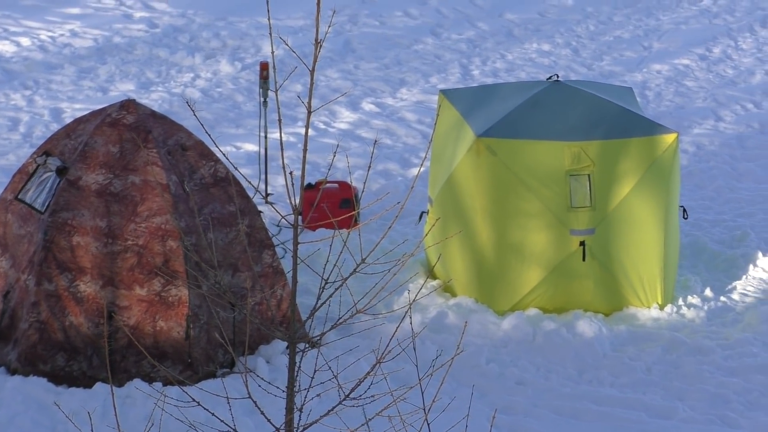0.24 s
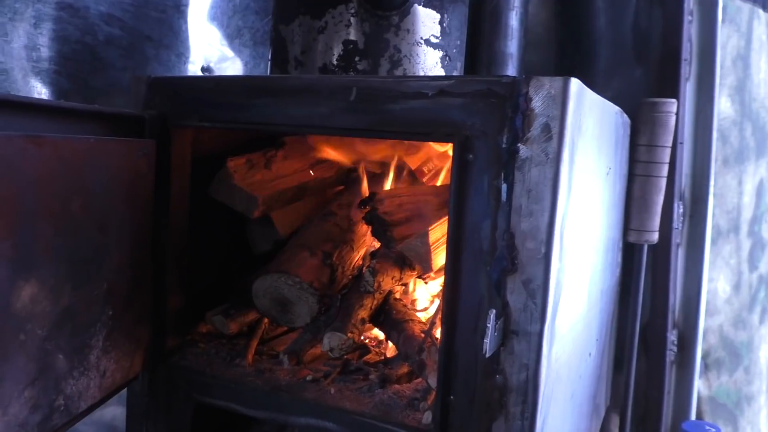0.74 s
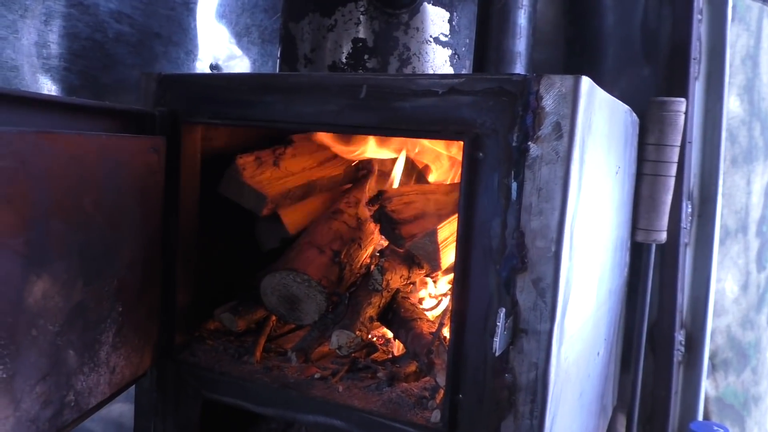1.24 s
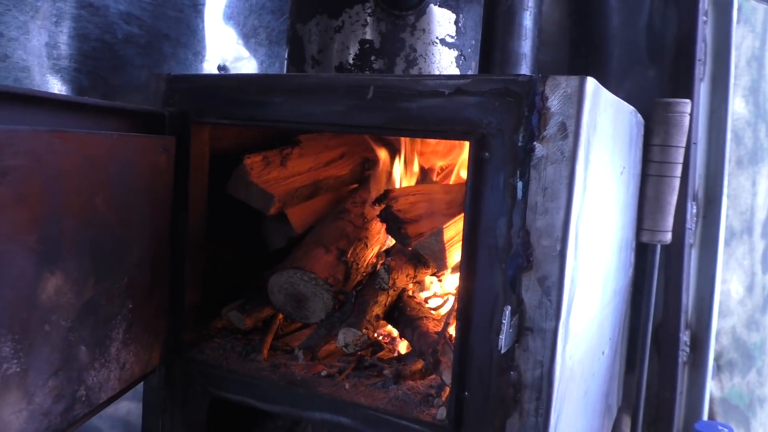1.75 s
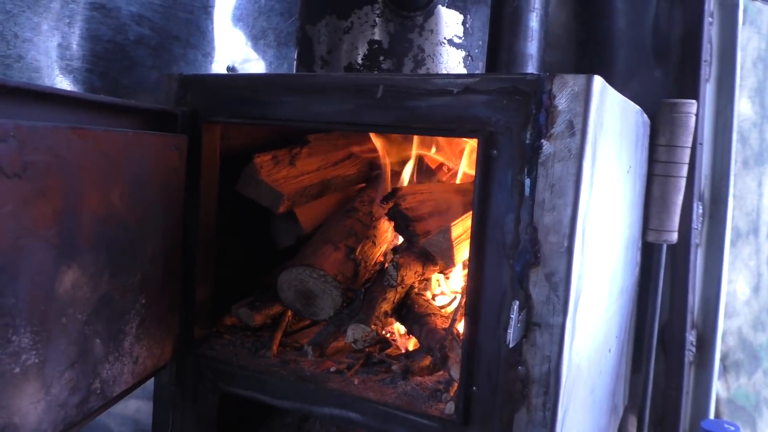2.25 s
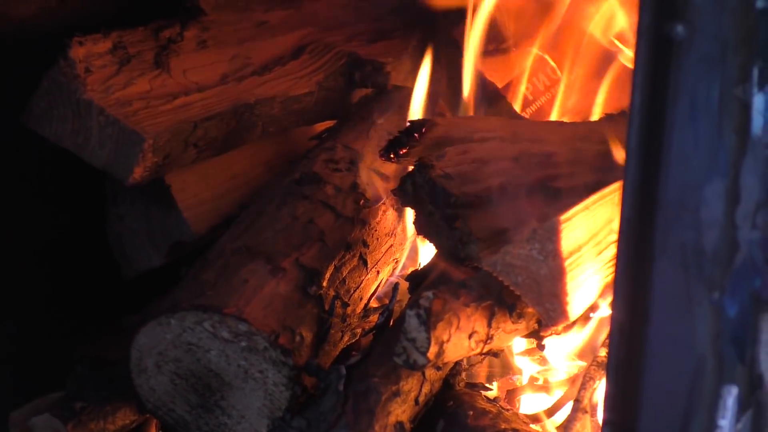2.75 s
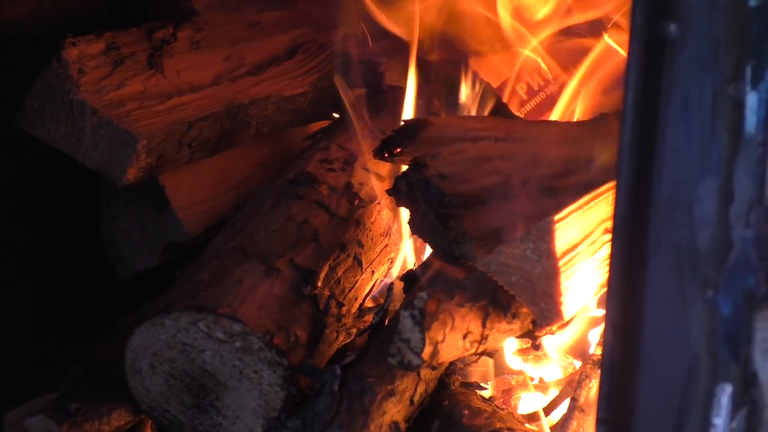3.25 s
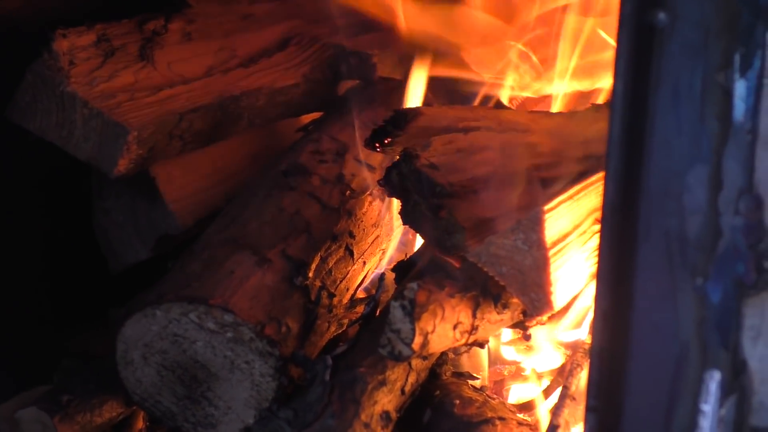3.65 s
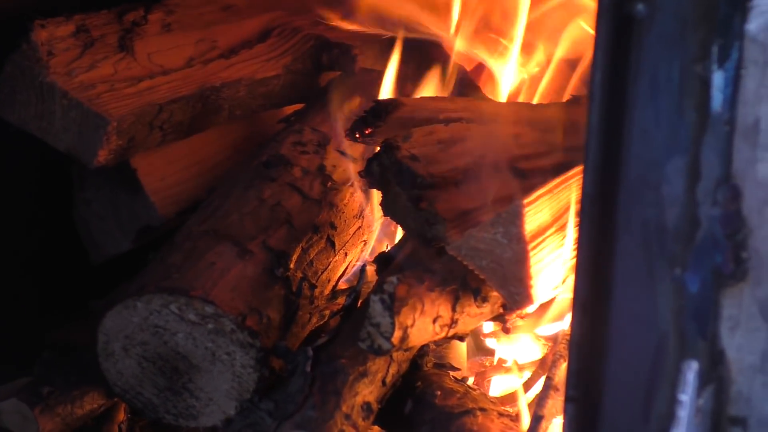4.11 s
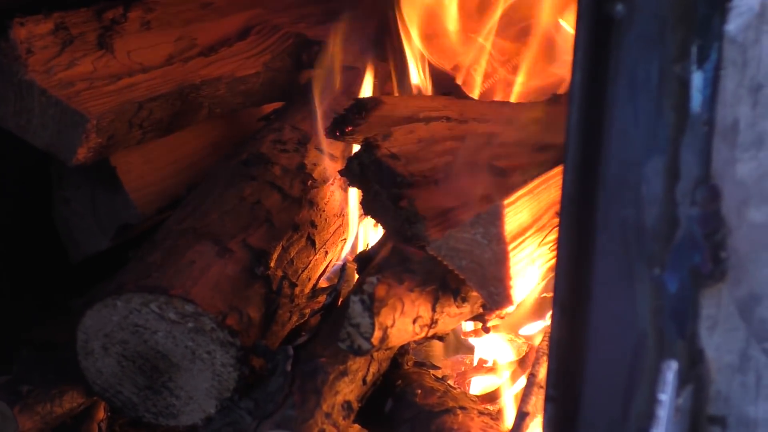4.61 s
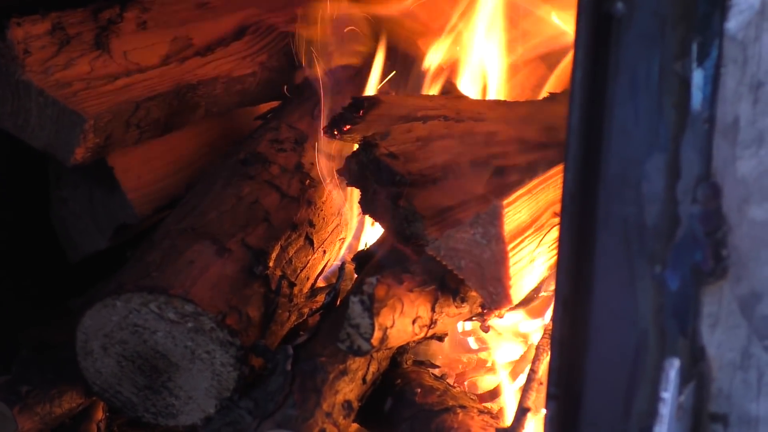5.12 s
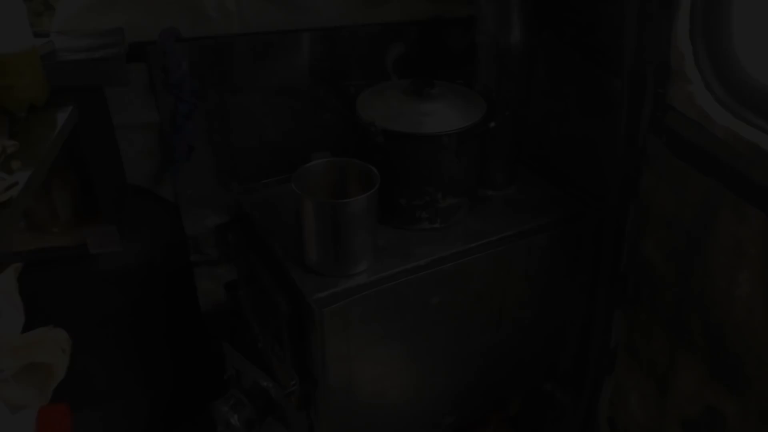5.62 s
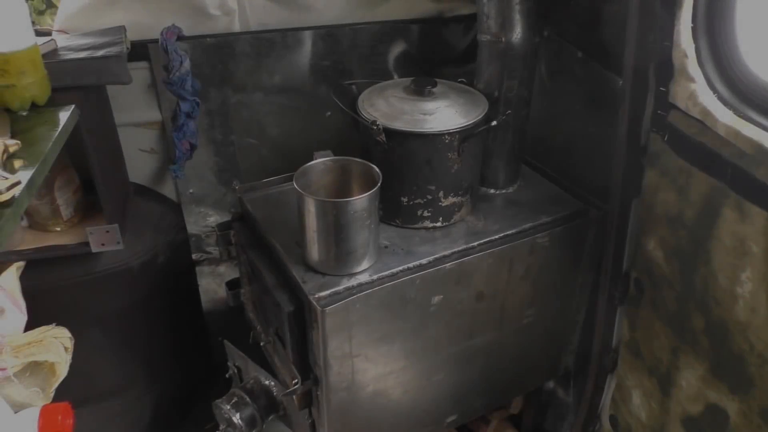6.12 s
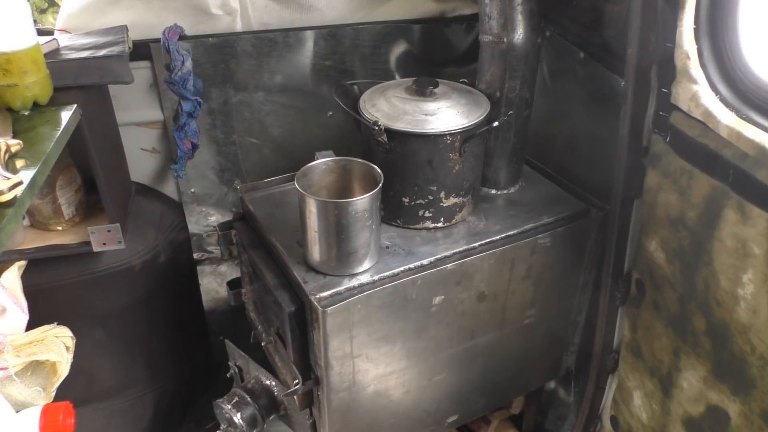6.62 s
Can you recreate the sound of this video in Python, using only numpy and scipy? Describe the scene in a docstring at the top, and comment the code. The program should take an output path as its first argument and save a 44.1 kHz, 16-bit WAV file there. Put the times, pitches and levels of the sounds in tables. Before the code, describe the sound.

From 0 to 0.66 s, quiet wind buffets the microphone over open snow: low, flickering rumble, small dull thuds near 0.13, 0.43, 0.53 and 0.6 s, and very faint airy hush. At 0.67 s it cuts to a close, wide stereo wood fire in a sheet-iron stove. Dense fine ticks and irregular sharp pops ride over a lumpy low roar and bright hiss, swelling around 2.2 s. Especially hard cracks land near 1.77 and 2.78 s; a millisecond splice interrupts at 2.33 s. Soft low puffs boom near 2.14 and 4.72 s, with brief metallic wall rings under some pops, thin steam whistles near 2.8 and 4.8 s, and a small gas rasp at 4.25 s. Crackling stays busy until an abrupt stop at 5.57 s. A pot's steady, fizzing simmer with a hollow metallic hum then fades in smoothly, reaching its quiet full level around 6.7 s.

```python
"""Wind buffeting a microphone over open snow opens the piece: flickering noise, struck resonances, faint air.
It cuts to logs burning in a sheet-iron stove with its door open: roar and hiss are shaped noise, pops and
crackle are filtered noise bursts, puffs and wall rings are struck resonances, with steam whistles and one rasp.
Last, a pot simmers on the stove, faded in: fizzing noise ringing the pot's walls.
"""
import sys
import numpy as np
from scipy import signal
from scipy.io import wavfile
from scipy.ndimage import uniform_filter1d, map_coordinates

SR = 44100
rng = np.random.default_rng(int(sys.argv[2]) if len(sys.argv) > 2 else 0)


def waveform_to_disk(signal):
    """Save audio, clipped to [-1, 1], as 16-bit WAV at the path in sys.argv[1]."""
    frames = np.transpose(np.atleast_2d(signal))
    scaled = np.clip(frames, -1, 1) * 32767
    samples = np.round(scaled).astype(np.int16)
    wavfile.write(sys.argv[1], SR, samples)


def attenuation_scalar(level_db):
    """Turn a level in dB into a linear amplitude multiplier (20 dB per decade)."""
    decades = np.asarray(level_db, float) / 20
    return 10 ** decades


N = 302694   # samples


def curve(points):
    """A table of (start_s, value) drawn as straight lines, sample by sample."""
    s, value = np.transpose(points)
    return np.interp(np.arange(N) / SR, s, value)


def at_hz(points, hz):
    """Value of a table on a log-frequency axis."""
    table_hz, value = np.transpose(points)
    return np.interp(np.log(hz), np.log(table_hz), value)


def rms_one(x):
    """Scaled to unit rms."""
    return x / np.sqrt(np.mean(x ** 2) + 1e-20)


def lean_left(db):
    """Left and right gains that set the left side db over the right."""
    return attenuation_scalar(np.array([[db / 2], [-db / 2]]))


def drift(rate):
    """Smooth random wander of spread about 1, with new values rate times a second."""
    knots = rng.standard_normal(400)
    return map_coordinates(knots, [np.arange(N) / SR * np.clip(rate, 0, 55)], order=3)


def band_pass(x, order, edges_hz):
    """Butterworth band-pass."""
    return signal.sosfilt(signal.butter(order, edges_hz, "band", fs=SR, output="sos"), x)


def top_cut(x):
    """Ends the sound steeply just under 16 kHz."""
    return signal.sosfilt(signal.ellip(10, .5, 50, 15750, fs=SR, output="sos"), x)


def resonate(x, modes):
    """Each mode lifts a narrow peak out of the sound; a negative lift carves a notch."""
    for hz, width_hz, lift_db in modes:
        b, a = signal.iirpeak(hz, hz / width_hz, fs=SR)
        x = x + (attenuation_scalar(lift_db) - 1) * signal.lfilter(b, a, x)
    return x


def boom(rows, hz, t60, edges_hz):
    """Single pushes (start_s, push_db) set one resonance ringing, decaying 60 dB in t60 seconds."""
    push = np.full(N, 1e-18)
    push[[round(s * SR) for s, db in rows]] = attenuation_scalar(np.array(rows)[:, 1])
    r = attenuation_scalar(-60 / (t60 * SR))
    w = 2 * np.pi * hz / SR
    ring = signal.lfilter([0, np.sin(w)], [1, -2 * r * np.cos(w), r * r], push)
    return band_pass(ring, 2, edges_hz)


# how alike left and right are in the fire's and wind's rush: pitch_hz, likeness (1 = identical)
RUSH_LIKENESS = [(30, 0.63), (70, 1), (600, 0.83), (1500, 0.61), (4000, 0.65), (15000, 0.83)]


def rush(colour, top_hz, flicker_db, flicker_rate, shared=0.24, likeness=RUSH_LIKENESS, lean=((1, 0), (2, 0))):
    """Stereo noise in third-octave bands, each with its own level, flicker and likeness; rms 1."""
    out = 0
    together = drift(flicker_rate / 2)
    white = rng.standard_normal((2, 2, N))   # neighbouring bands take different noise
    edges = 25 * 2 ** np.arange(0, 9.5, 1 / 3)
    for k, (low, high) in enumerate(zip(edges, edges[1:])):
        if high > top_hz:
            break
        hz = np.sqrt(low * high)
        mid, side = band_pass(white[k % 2], 2, [low, high])
        alike = np.clip(at_hz(likeness, hz), 0, 1)
        stereo = np.sqrt(1 + alike) * mid + np.sqrt(1 - alike) * side * [[1], [-1]]
        gain = attenuation_scalar(at_hz(colour, hz) + flicker_db * (shared * together + drift(flicker_rate)))
        out = out + gain * lean_left(at_hz(lean, hz)) * stereo
    return rms_one(top_cut(out))


# tone of the buffeting: pitch_hz, level_db (per Hz, relative)
WIND_COLOUR = [(25, -10), (136, -4), (325, -22), (667, -45)]
# tone of the open-air hush: pitch_hz, level_db (per Hz, relative)
AIR_COLOUR = [(500, -18.5), (787, -17.5), (1290, -11.5), (6280, -31.5), (15100, -24.5)]
# stereo of the open air: pitch_hz, likeness (1 = identical)
AIR_LIKENESS = [(600, 0.91), (1400, 0.3), (3100, 0.054), (9000, 0.45)]
# single eddies striking the microphone ports: start_s, push_db
GUSTS = [(0.129, -31.5), (0.43, -30.5), (0.529, -35), (0.615, -34)]
WIND_DB, AIR_DB = -49, -62.5   # rms


def wind():
    """Eddies buffet the microphone ports as low flickering noise and thuds, over a faint open-air hush."""
    buffet = attenuation_scalar(WIND_DB) * rush(WIND_COLOUR, 1100, flicker_db=1.0, flicker_rate=31.0, shared=1.4)
    thuds = boom(GUSTS, 155, 0.041, [70, 450])
    hush = rush(AIR_COLOUR, 17000, flicker_db=1.5, flicker_rate=12.3, likeness=AIR_LIKENESS)
    return buffet + thuds + attenuation_scalar(AIR_DB) * hush


# how fiercely the fire burns, as hiss before the firebox rings: start_s, level_db
VIGOUR = [(0.75, -53), (1.21, -53), (1.48, -51.5), (2.16, -44.5), (2.41, -54.5), (3.29, -54), (3.39, -51),
          (3.83, -55.5), (4.09, -51.5), (4.43, -50), (5.45, -55.5)]
# tone of the roar: pitch_hz, level_db (per Hz, relative)
FLAME_COLOUR = [(25, -23.5), (64, -10.5), (140, 6), (168, -0.5), (255, -21.5), (395, -12.5), (591, -42),
                (900, -27.5)]
# tone of the hiss: pitch_hz, level_db (per Hz, relative)
HISS_COLOUR = [(500, -18.5), (859, -7), (1280, 5), (1540, -0.5), (4760, -12), (11600, -9.5), (15100, -5)]
# what the hiss rings in the firebox: pitch_hz, width_hz, lift_db
FIREBOX = [(2210, 240, 3.5)]
ROAR_DB, ROAR_FOLLOWS = -42.5, 0.73   # roar at the vigour table's mean, before the flue; dB per dB of hiss
FLUE_HZ, FLUE_WIDTH_HZ = 400, 79
FLUE_LIFT_DB, FLUE_FOLLOWS = 5, 0.42   # lift at the same mean; dB more per dB of flare


def flame():
    """A lumpy roar rings the flue and gas hisses out of the wood; both follow the fire's vigour."""
    hiss_db = curve(VIGOUR)
    flare_db = hiss_db - np.mean(VIGOUR, axis=0)[1]
    roar_db = ROAR_DB + ROAR_FOLLOWS * flare_db
    roar = attenuation_scalar(roar_db) * rush(FLAME_COLOUR, 1100, flicker_db=2.5, flicker_rate=40., shared=1.23)
    roar = resonate(roar, [(FLUE_HZ, FLUE_WIDTH_HZ, FLUE_LIFT_DB + FLUE_FOLLOWS * flare_db)])
    hiss = attenuation_scalar(hiss_db) * rush(HISS_COLOUR, 17000, flicker_db=2.5, flicker_rate=46.0, shared=1.0)
    return (roar + resonate(hiss, FIREBOX)) * lean_left(0.8)


# thin fibres tick high, thick ones lower: low_hz, high_hz
GRAIN_BANDS = [(7000, 15500), (9500, 15500), (2500, 8000)]
GRAINS_PER_S = 450   # median rate
GRAIN_DB, GRAIN_SPREAD_DB = 13, 4.5   # impulse over the hiss level, before its band-pass; random extra


def grains():
    """Bark fibres part in single dry ticks, in clumps, each in one of a few brightness bands."""
    born = rng.random(N) < GRAINS_PER_S * attenuation_scalar(5.0 * drift(12)) / SR
    extra_db = GRAIN_SPREAD_DB * np.minimum(rng.exponential(1, N), 4)
    size = attenuation_scalar(curve(VIGOUR) + GRAIN_DB + extra_db) * rng.choice([-1, 1], N)
    kind = rng.integers(len(GRAIN_BANDS), size=N)
    return sum(band_pass(born * size * (kind == k) + 1e-18, 2, edges_hz)
               for k, edges_hz in enumerate(GRAIN_BANDS))


# what the bursts ring: pitch_hz, width_hz, lift_db
POP_COLOUR = [(431, 42, 9), (1267, 90, 8.5), (1735, 750, 10), (2183, 60, 5.5), (11220, 2000, 3.5)]
# left over right of knock, snap, sizzle, thump: side_db
POP_SIDE = -1.4, 0.4, 1, -0.6
# middle pitches of the two rings each splitting cell has of its own: pitch_hz
CELL_PITCHES = (2500, 8000)
CELL_SPREAD_OCT, CELL_LIFT_DB = .6, 6
SNAP_SHARE, SNAP_DIP_DB = 0.42, -4.5   # the 5 kHz snap lies between knock and sizzle, a little lower
TAIL_FOLLOWS, TAIL_GROWS = 0.11, 0.11   # more tail for deeper and for stronger bursts: dB per dB
TAIL_THINS_HZ = 2500   # the scattered tail loses its low end under this


def bursts(rows, tail_db):
    """A cell splits in a sharp crack and a spray; the firebox walls return it and scatter a short tail."""
    s, sizzle_db, depth_db = np.transpose(rows)
    t = np.arange(2200) / SR
    chance = rng.standard_normal((len(s), 3 * len(t) + 3))
    noise = chance[:, 3:].reshape(len(s), 3, len(t))
    pan_db = 0.84 * chance[:, 0]
    knock_db = sizzle_db + depth_db
    snap_db = sizzle_db + SNAP_SHARE * depth_db + SNAP_DIP_DB
    thump_db = knock_db - 15.0

    spray = attenuation_scalar(-60 * t / 0.004) * np.clip(t / .0001, 0, 1)
    own_tail_db = tail_db + TAIL_FOLLOWS * np.clip(depth_db, -25, 5) + TAIL_GROWS * np.maximum(sizzle_db, -45)
    tail = attenuation_scalar(own_tail_db[:, None, None] - 60 * t / 0.048) * np.clip(t / 0.00017, 0, 1)
    crack = noise[:, :1] * spray
    crack[:, :, 3] += 4.28 * np.sign(noise[:, :1, 0])   # the first break is one sharp step
    lag = round(0.0029 * SR)   # wall to wall and back
    crack = crack + 0.23 * np.roll(crack, lag, axis=2) + 0.12 * np.roll(crack, 2 * lag, axis=2)
    scatter = noise[:, :1] + 0.7 * noise[:, 1:]   # differs left and right
    scatter = signal.lfilter(*signal.butter(1, TAIL_THINS_HZ, "high", fs=SR), scatter)
    crack = resonate(crack + tail * scatter + 0.25 * spray * noise[:, 1:], POP_COLOUR)
    own_hz = np.multiply(CELL_PITCHES, 2 ** (CELL_SPREAD_OCT * chance[:, 1:3]))
    own_hz = np.clip(own_hz, 900, 15000)
    crack = np.array([resonate(pop, [(hz, hz / 4, CELL_LIFT_DB) for hz in pair])
                      for pop, pair in zip(crack, own_hz)])

    sound = 0
    bands_hz = [(1104, 3300), (3710, 6390), (8090, 15870), (220, 730)]
    for edges_hz, level_db, side_db in zip(bands_hz, [knock_db, snap_db, sizzle_db, thump_db], POP_SIDE):
        band = band_pass(crack, 3, edges_hz)
        if edges_hz[0] < 500:   # long waves reach both sides alike
            band = band.mean(axis=1, keepdims=True)
        # each band is levelled on its loudest 2 ms
        loudest = np.sqrt(uniform_filter1d(band.mean(axis=1) ** 2, size=90).max(axis=1))
        sound = sound + band * (attenuation_scalar(level_db) / loudest)[:, None, None] * lean_left(side_db)

    out = np.zeros((2, N + len(t)))
    for start, pop, pan in zip(np.round(s * SR).astype(int), sound, pan_db):
        out[:, start:start + len(t)] += pop * lean_left(pan)
    return out[:, :N]


def crackle():
    """Many faint ticks at random moments, a few larger; they swell and sink with the fire."""
    draw = rng.random((700, 3))
    s = CUTS[1] + draw[:, 0] * (CUTS[-1] - CUTS[1])
    over_hiss_db = -7.5 - 4.5 * np.log(draw[:, 1] + 0.0069)
    size_db = curve(VIGOUR)[(s * SR).astype(int)] + over_hiss_db
    depth_db = -12 + 14.5 * draw[:, 2]
    return bursts(np.transpose([s, size_db, depth_db]), tail_db=-6.0)


# wood bursts: start_s, sizzle_db (8-16 kHz band, loudest 2 ms), depth_db (knock near 2 kHz against sizzle)
POPS = [(0.6909, -38, -3.5), (0.7344, -29.5, -5.5), (0.7611, -20, -1.5), (0.7807, -31.5, 2.5),
        (0.8093, -32, -34), (0.8627, -29.5, -4.5), (0.9149, -38, -5), (0.95, -21, -10.5),
        (0.971, -31.5, -11), (0.9851, -14, -7), (1.0075, -16, -7.5), (1.092, -34, -16), (1.1291, -16, -4),
        (1.1879, -42, -12), (1.1938, -41, -11), (1.2118, -33.5, -20), (1.252, -33.5, -31),
        (1.3128, -51, 19), (1.3949, -40, -8), (1.4091, -33.5, -21), (1.4269, -23, 0.5), (1.4341, -20.5, -7),
        (1.4571, -31.5, -6), (1.4706, -37, -6), (1.4873, -35, -11), (1.505, -15, -11.5), (1.5303, -23, -14),
        (1.568, -31.5, -2), (1.5955, -24, -4.5), (1.6289, -24, 3), (1.733, -24.5, -3), (1.7661, -7, -7.5),
        (1.7914, -31.5, 0.5), (1.8223, -29, 0), (1.8702, -23.5, -15.5), (1.8878, -20.5, -19),
        (1.9068, -34, -2), (1.9204, -28, -3), (1.9575, -21.5, 5.5), (1.9763, -30, -2), (2.0391, -39, -6),
        (2.0667, -30.5, -26), (2.089, -42, -6), (2.1403, -24.5, 2), (2.2097, -14, -8), (2.259, -19, -23),
        (2.2685, -18, -7.5), (2.3145, -25, 1.5), (2.3541, -39.5, -4.5), (2.487, -29.5, 2.5),
        (2.4967, -38, -6), (2.5218, -38.5, -9), (2.5946, -29, -6.5), (2.6249, -21.5, -8),
        (2.6663, -35.5, -7), (2.688, -41, -8), (2.7263, -35.5, -12), (2.7787, -7, -14.5),
        (2.8534, -38.5, -9), (2.9466, -25, -1), (2.962, -14.5, -8), (2.9934, -41, -16), (3.0027, -20, -10),
        (3.0918, -34.5, -4.5), (3.2232, -26.5, -8), (3.278, -13, -10), (3.3563, -31.5, -10),
        (3.3735, -25, -11.5), (3.3998, -36, -12), (3.4113, -26, -14), (3.4329, -41, 10), (3.5085, -36, -6),
        (3.5412, -33, -17), (3.5475, -19, -9.5), (3.5696, -31, -26), (3.5848, -12.5, -14),
        (3.6644, -29, -13), (3.806, -13.5, -10.5), (3.8161, -22, 2), (3.8777, -16, -9.5),
        (3.8996, -35, -10), (3.9085, -20, -2), (3.9647, -26.5, -4.5), (3.9817, -30.5, -23),
        (4.0071, -38, -5), (4.0298, -35.5, -2), (4.0833, -20.5, -0.5), (4.1059, -21.5, -8),
        (4.1316, -32, -8), (4.1965, -34, 6), (4.2385, -17, -17), (4.3555, -14.5, -5), (4.3742, -36, -3),
        (4.5607, -24.5, -16.5), (4.6078, -30, -10), (4.6188, -14.5, -11), (4.635, -27, -6),
        (4.6554, -20.5, -11.5), (4.6905, -36, -7), (4.7022, -37, -17), (4.7171, -13.5, 2.5),
        (4.7665, -12, -9.5), (4.7752, -21.5, -3.5), (4.846, -28, -10.5), (4.9158, -11.5, -7),
        (4.9549, -21.5, -8), (4.9617, -14, -7.5), (5.0289, -21.5, -21), (5.0368, -32, -18),
        (5.0459, -22.5, -2.5), (5.0894, -31, -2), (5.1055, -33.5, -0.5), (5.1299, -51, 8),
        (5.1498, -16.5, -7.5), (5.2079, -12, -17), (5.2993, -37.5, -12), (5.4158, -41.5, -3.5),
        (5.4911, -18.5, -2.5), (5.5499, -36.5, 6.5)]


def pops():
    """Larger wood cells burst one by one, each with its own strength and depth."""
    return bursts(POPS, tail_db=-7.0)


# gas pockets igniting: start_s, push_db
PUFFS = [(1.504, -21.5), (1.634, -34), (1.762, -30), (1.957, -19.5), (2.142, -15), (3.01, -25.5),
         (3.809, -31), (4.558, -30), (4.611, -26), (4.722, -14.5), (5.15, -32.5), (5.21, -34),
         (5.493, -23.5)]


def puffs():
    """Each soft push sets the air in the firebox booming for a few cycles."""
    return boom(PUFFS, 143.0, 0.068, [75, 320]) * lean_left(1.0)


# sap steam jets: start_s, length_s, level_db (rms before wavering)
WHISTLES = [(2.335, .14, -62.5), (2.79, .15, -61), (4.76, .14, -59)]


def whistles():
    """Steam forced through a pore sings on one thin, slightly wavering pitch for a moment."""
    t = np.arange(N) / SR
    pitch_hz = 1730 + 18 * drift(50)
    tone = np.sin(2 * np.pi * np.cumsum(pitch_hz) / SR) * np.sqrt(2) * attenuation_scalar(4 * drift(40))
    return tone * sum(attenuation_scalar(db) * np.clip(np.minimum(t - s, s + length - t) / .02, 0, 1)
                      for s, length, db in WHISTLES)


# low wall ring under some of the pops: start_s, push_db
WALL_RINGS = [(2.7792, -19.5), (3.0022, -28), (4.0829, -22), (4.7162, -14), (4.9162, -21), (4.9608, -21.5),
              (5.2084, -25), (5.4907, -17)]


def wall_rings():
    """A loud pop sets the stove wall ringing very briefly near 1.2 kHz."""
    return boom(WALL_RINGS, 1235, 0.021, [800, 1600])


# the gas escape: start_s, length_s, level_db (rms before sputter and fade)
SIGH = 4.254, .08, -47


def sigh():
    """A pocket of gas escapes with a soft rasp: mid-range noise that sputters and dies away."""
    s, length, db = SIGH
    t = np.arange(N) / SR
    rasp = rms_one(band_pass(rng.standard_normal(N), 2, [1000, 2200]))
    swell = np.clip(np.minimum((t - s) / 0.0072, (s + length - t) / length), 0, 1)
    return attenuation_scalar(db) * rasp * attenuation_scalar(5.5 * drift(55)) * swell


# tone of the bubbling: pitch_hz, level_db (per Hz, relative)
SIMMER_COLOUR = [(30, -12), (76, -9.5), (150, 5.5), (217, -12.5), (268, -7), (547, -17.5), (1340, -10.5),
                 (2470, -10.5), (12300, -25.5), (15200, -27)]
# what the pot rings: pitch_hz, width_hz, lift_db
POT = [(258.5, 14, 12), (286.5, 11, 10), (330, 7.8, 11), (395, 7, 12), (495, 15, 11.5), (710, 25, 8.5),
       (954, 22, 12), (1200, 40, 11.5), (1360, 31, 15), (1690, 97, 11.5), (2026, 21, 10), (2246, 24, 10.5),
       (2860, 290, 5.5), (7500, 210, -14), (10300, 1900, 4.5)]
# stereo of the pot: pitch_hz, likeness (1 = identical)
POT_LIKENESS = [(60, 0.75), (130, 0.94), (3100, 0.85), (8000, 0.94), (15000, 0.85)]
# stereo lean of the pot: pitch_hz, side_db (left over right)
POT_SIDE = [(60, 1.5), (400, 0.7), (2400, -2.5), (8000, -0.7)]
# the fade-in: level_db (rms at full), start_s, length_s
SIMMER = -43, 5.543, 1.155


def simmer():
    """Countless tiny bubbles, as flickering noise, ring the pot's walls; a straight ramp fades them in."""
    level_db, start_s, length_s = SIMMER
    bubbles = rush(SIMMER_COLOUR, 17000, flicker_db=0.75, flicker_rate=28.0, shared=0.76,
                   likeness=POT_LIKENESS, lean=POT_SIDE)
    ramp = np.clip((np.arange(N) / SR - start_s) / length_s, 0, 1)
    return attenuation_scalar(level_db) * ramp * rms_one(resonate(bubbles, POT))


# wind ends, fire starts, a splice opens a gap of a few milliseconds in the fire scene,
# the gap closes, fire ends as the pot enters: start_s
CUTS = .661, .672, 2.325, 2.333, 5.569


def scene():
    """The three places in turn, each with edges of a few milliseconds."""
    t = np.arange(N) / SR
    after = [np.clip((t - cut) / .004, 0, 1) for cut in CUTS]
    ticks = top_cut(grains() + crackle())
    stove = flame() + ticks + pops() + puffs() + whistles() + wall_rings() + sigh()
    burning = after[1] - (after[2] - after[3]) - after[4]
    return wind() * (1 - after[0]) + stove * burning + simmer() * after[4]


def gain_control(x, threshold_db=-8.5, share=0.49, release_db_per_s=35.0, attack_s=0.023):
    """Peaks over the threshold turn the level down in tens of milliseconds; it creeps back; 1 dB make-up."""
    peak_db = 20 * np.log10(np.abs(x).max(axis=0) + 1e-9)
    over_db = share * np.maximum(peak_db - threshold_db, 0)
    ramp = release_db_per_s * np.arange(N) / SR
    held_db = np.maximum.accumulate(over_db + ramp) - ramp   # falls back at the release rate
    r = np.exp(-1 / (attack_s * SR))
    return x * attenuation_scalar(1.0 - signal.lfilter([1 - r], [1, -r], held_db))


def band_limit(x):
    """A steep low-pass at the top of the band."""
    return signal.sosfilt(signal.butter(12, 16960, fs=SR, output="sos"), x)


def record(dry):
    """Gain control, a steep cut of the top, and a ceiling at full scale."""
    levelled = gain_control(dry)
    x = signal.sosfilt(signal.cheby2(10, 50, 16850, fs=SR, output="sos"), levelled)
    return band_limit(np.clip(x, -1, 1))


dry = scene()
out = record(dry)
waveform_to_disk(out)
```